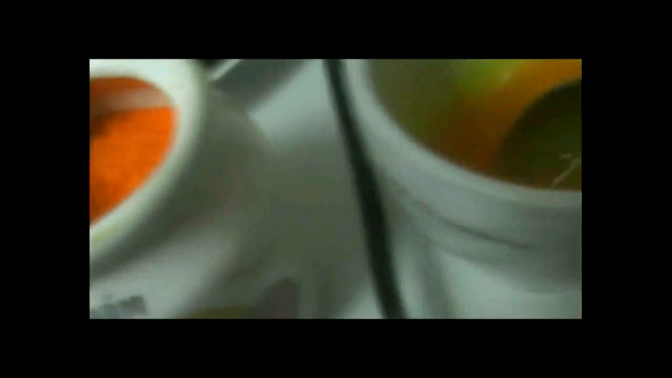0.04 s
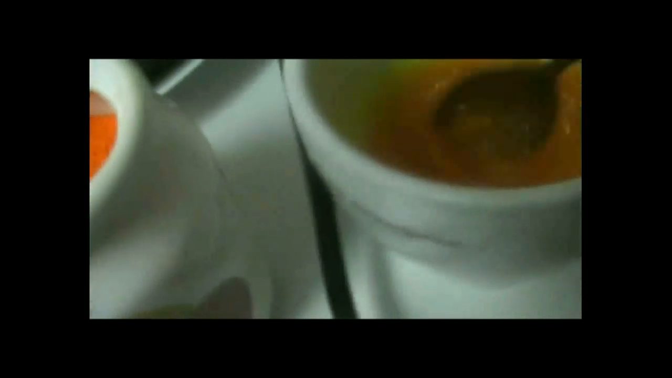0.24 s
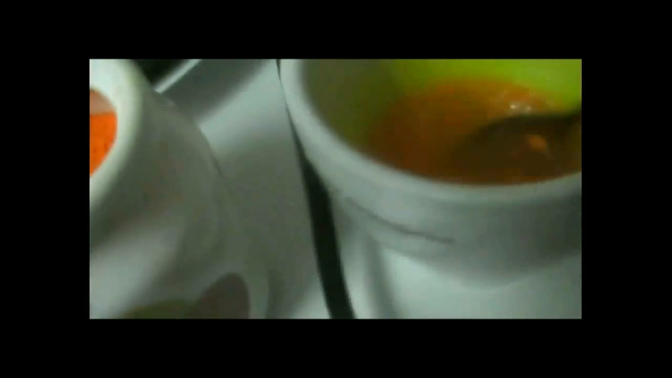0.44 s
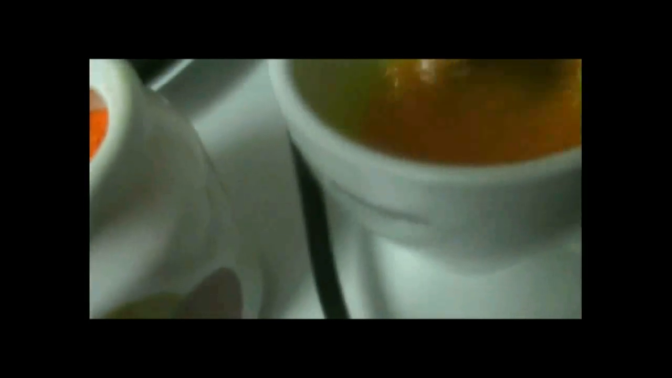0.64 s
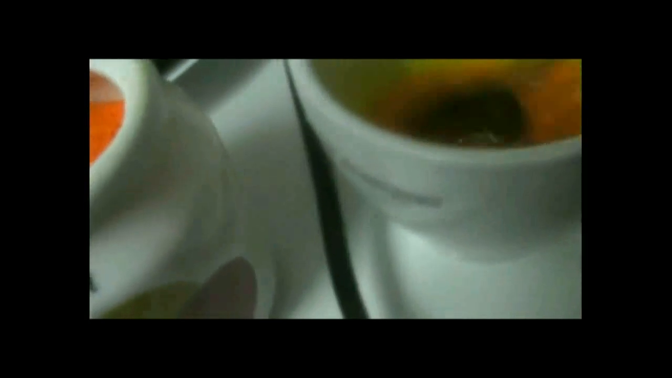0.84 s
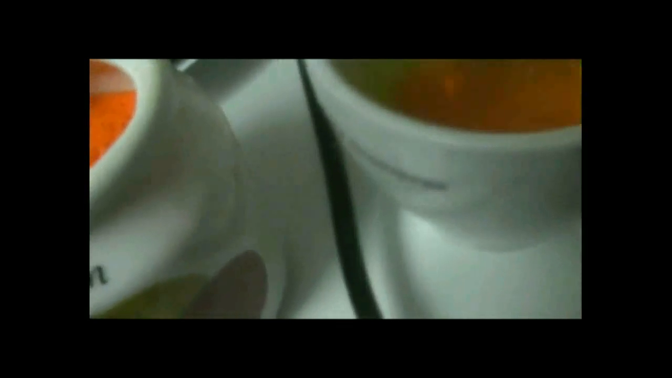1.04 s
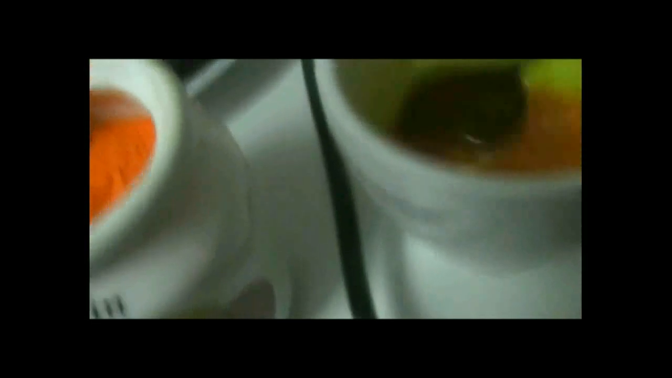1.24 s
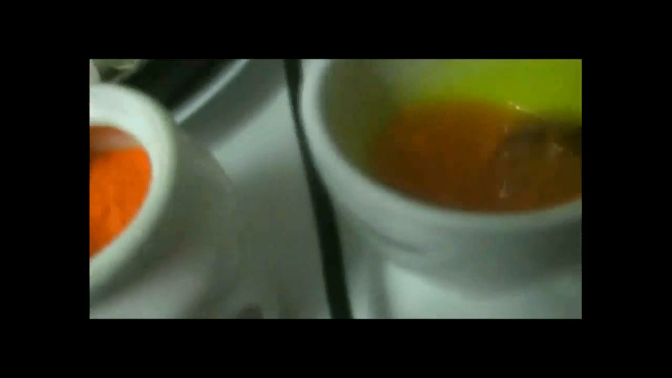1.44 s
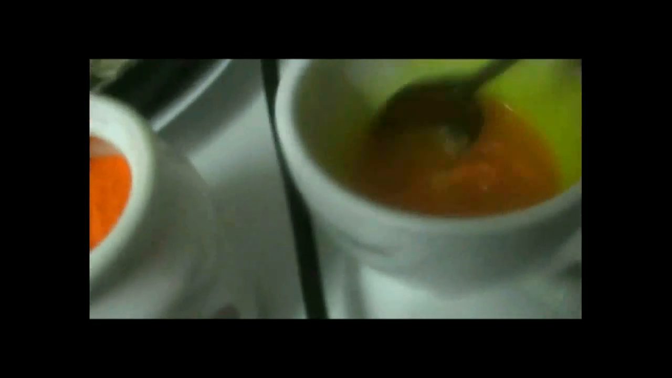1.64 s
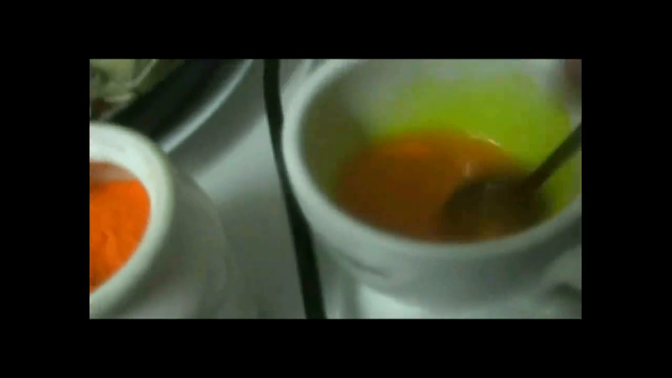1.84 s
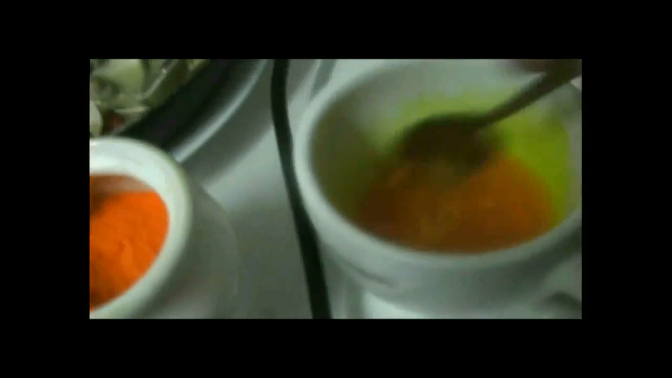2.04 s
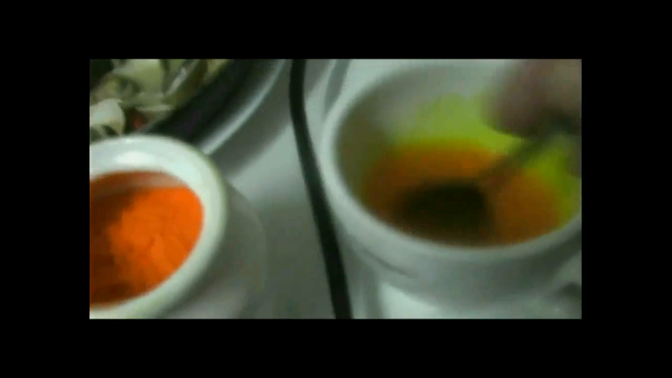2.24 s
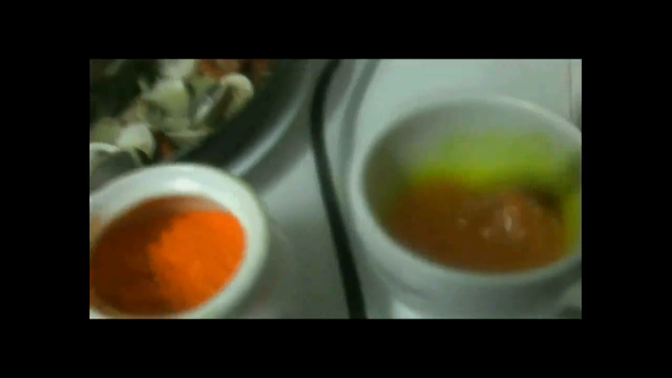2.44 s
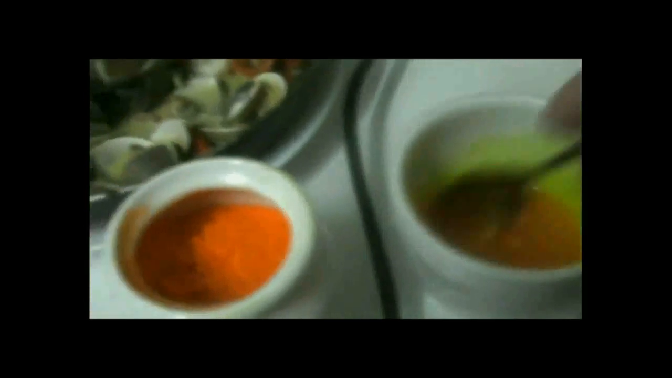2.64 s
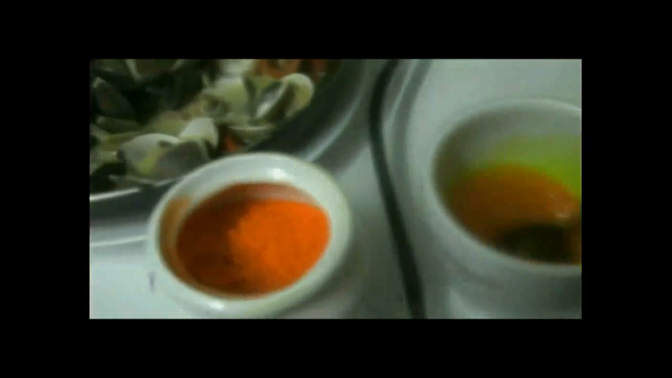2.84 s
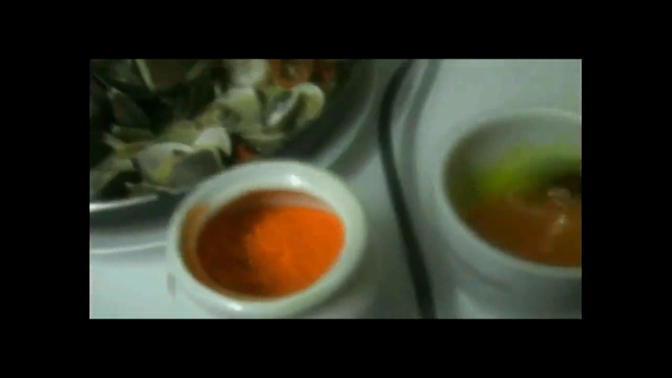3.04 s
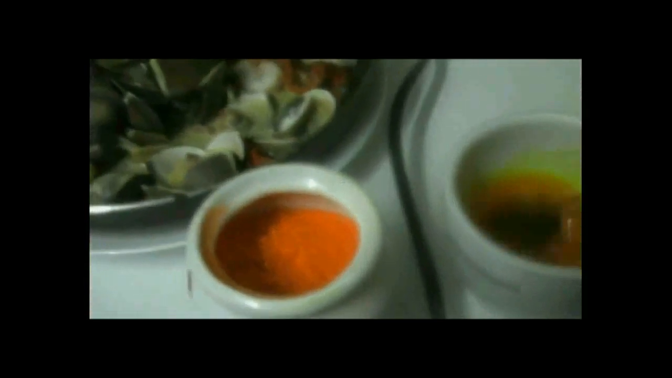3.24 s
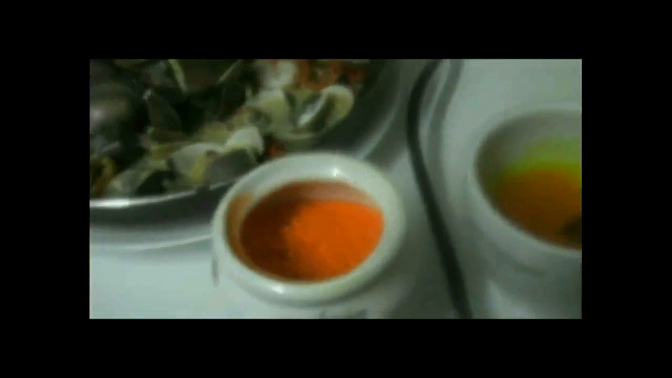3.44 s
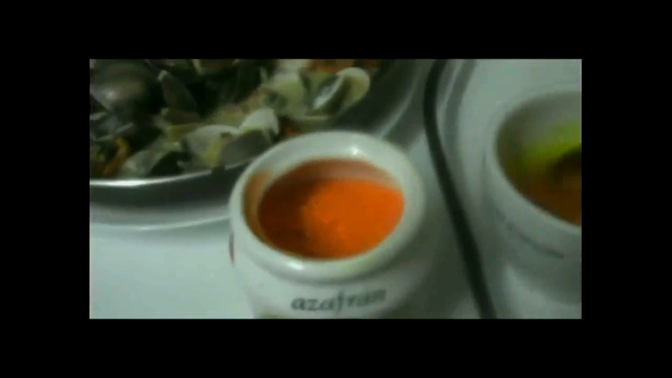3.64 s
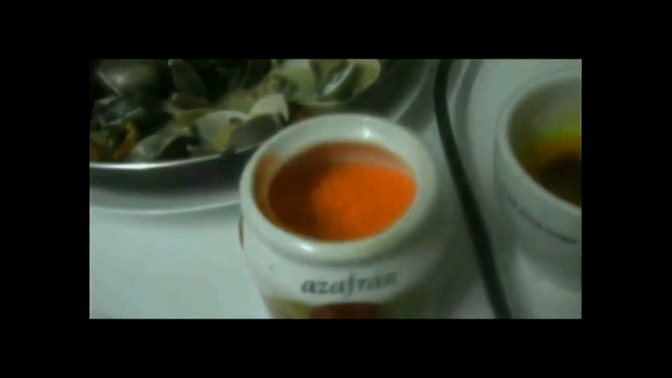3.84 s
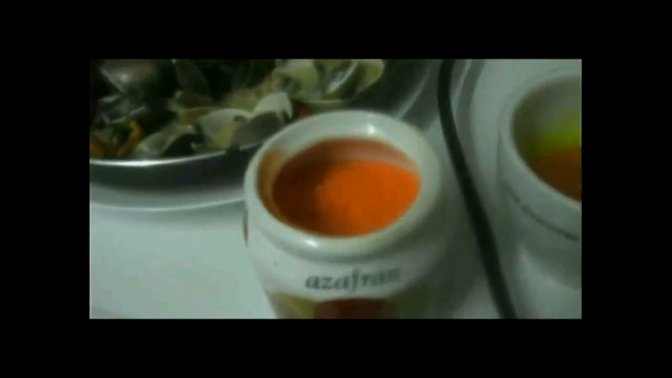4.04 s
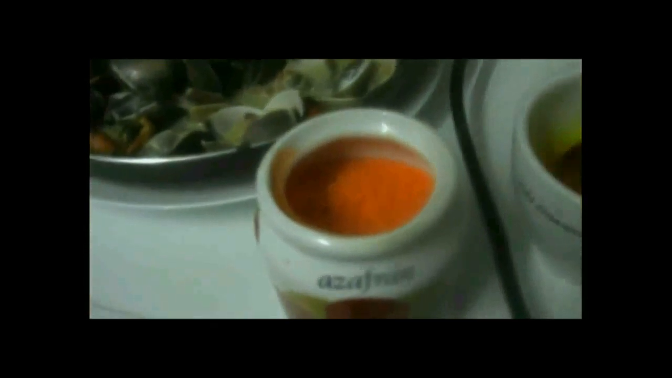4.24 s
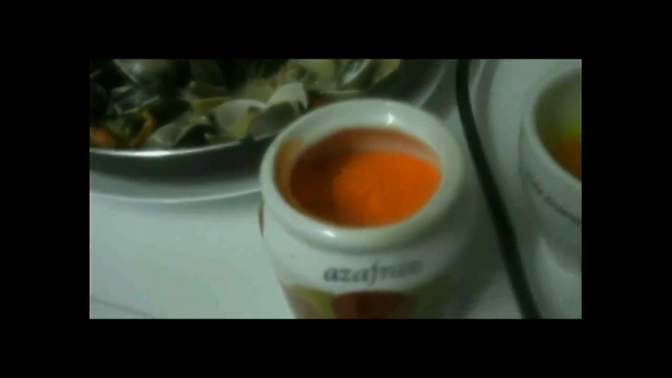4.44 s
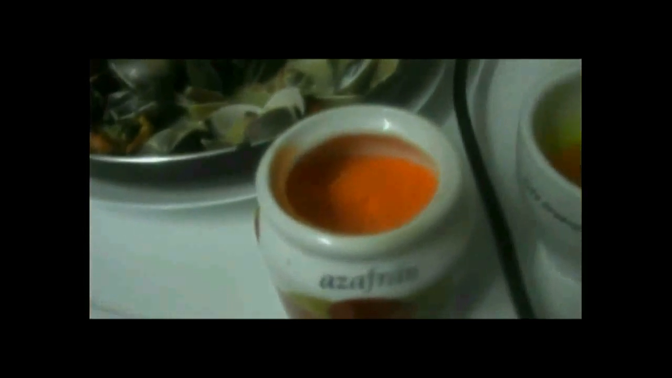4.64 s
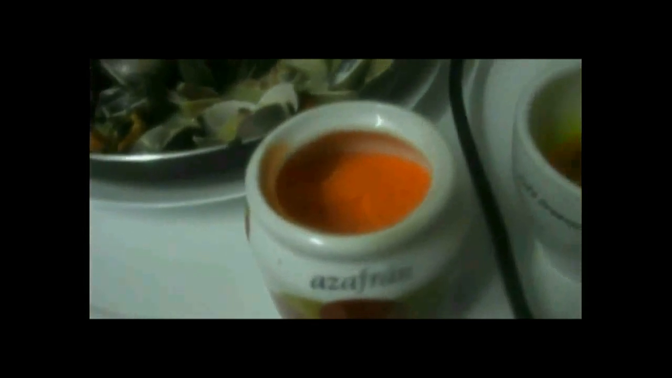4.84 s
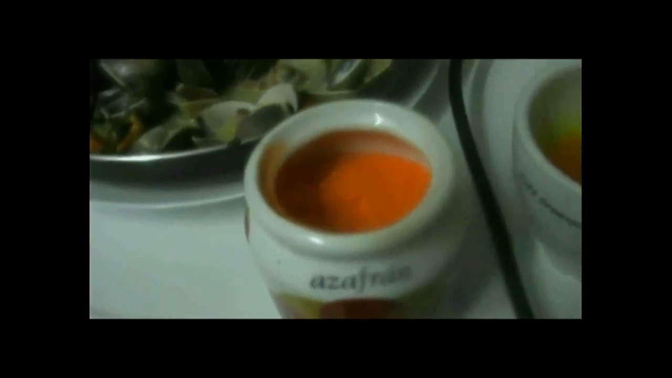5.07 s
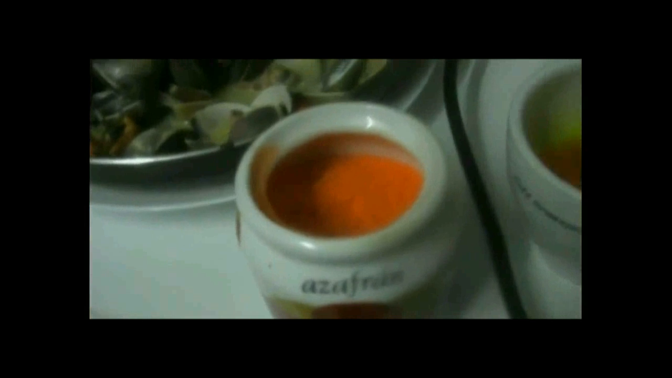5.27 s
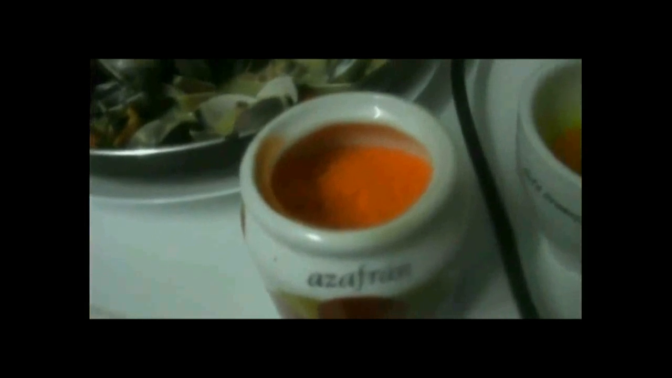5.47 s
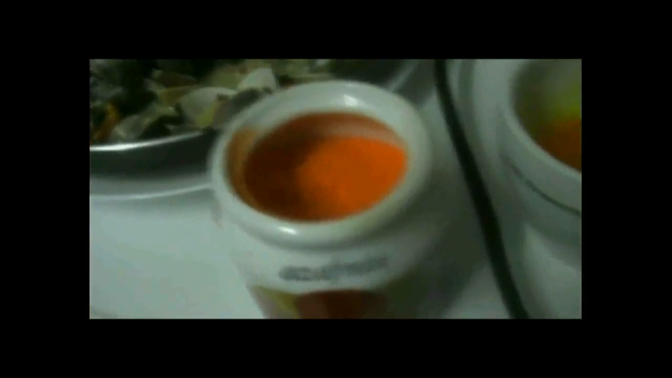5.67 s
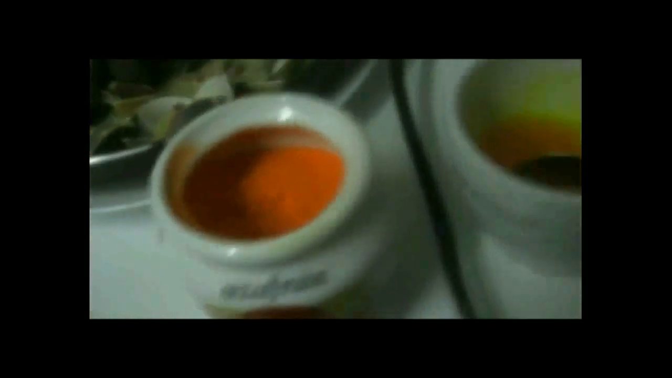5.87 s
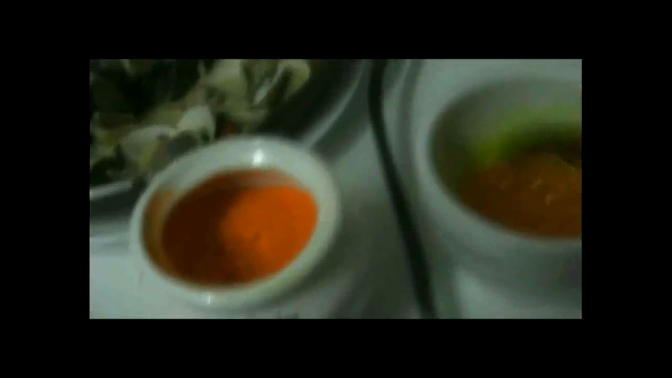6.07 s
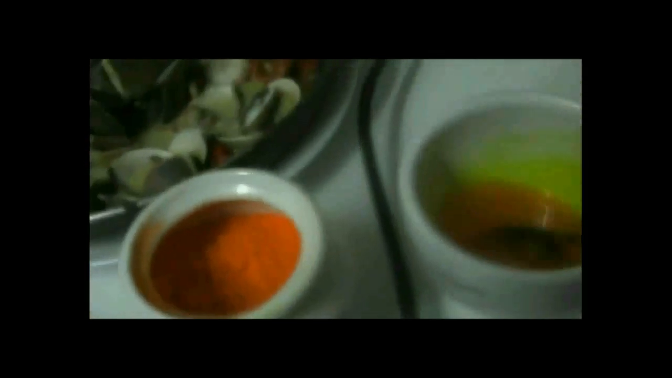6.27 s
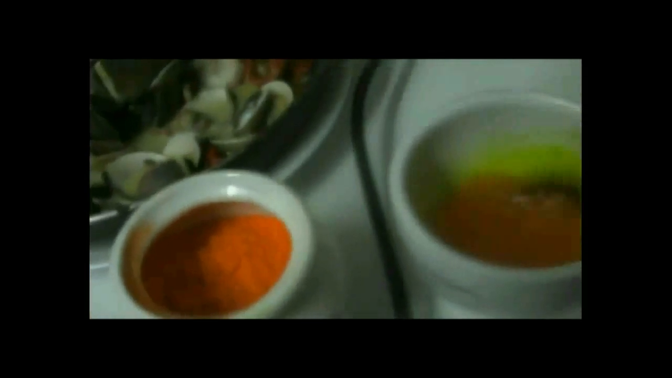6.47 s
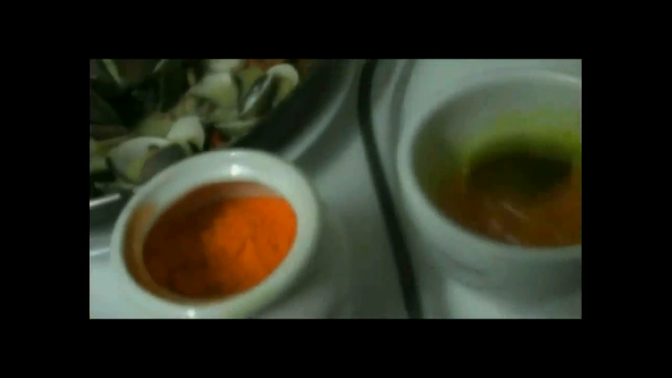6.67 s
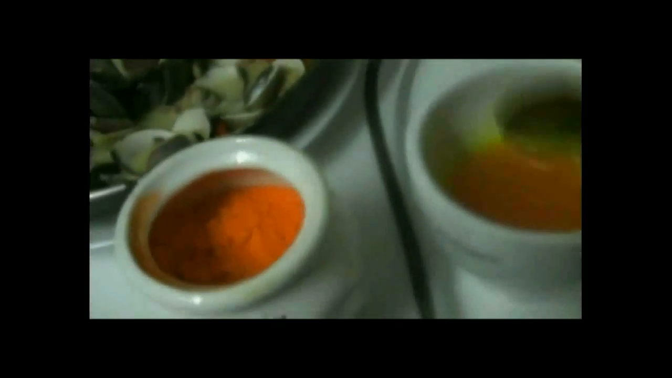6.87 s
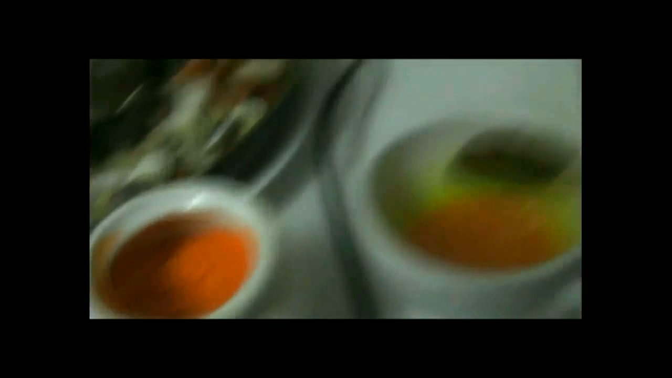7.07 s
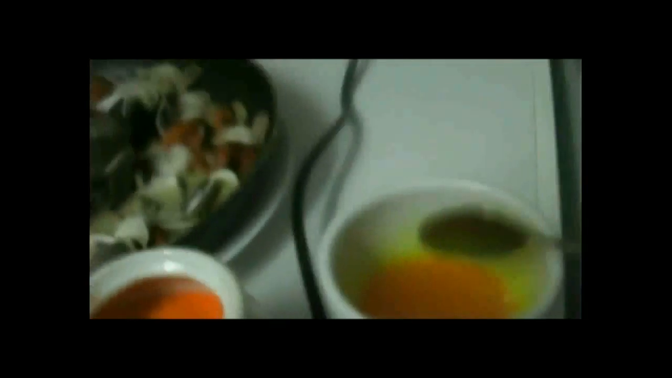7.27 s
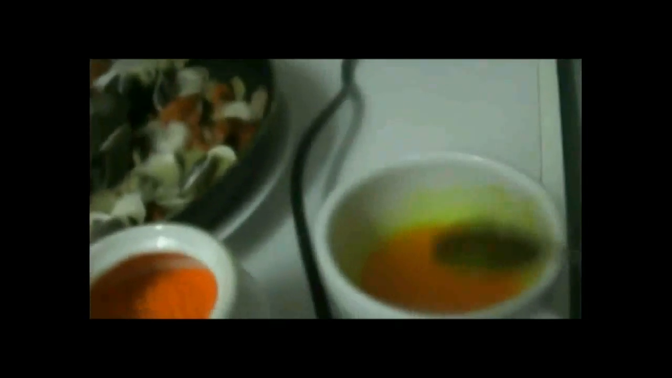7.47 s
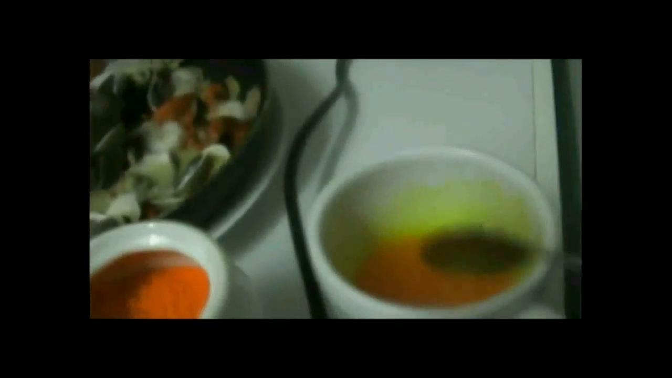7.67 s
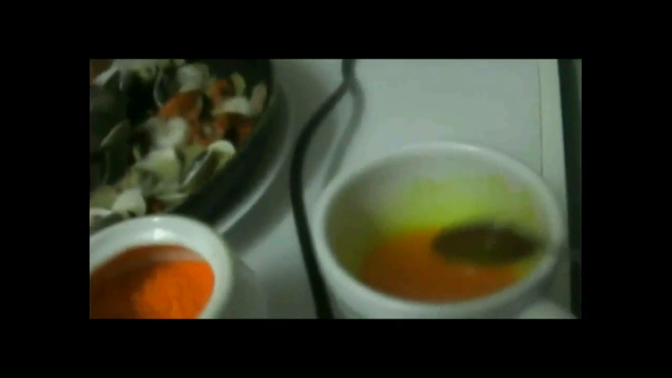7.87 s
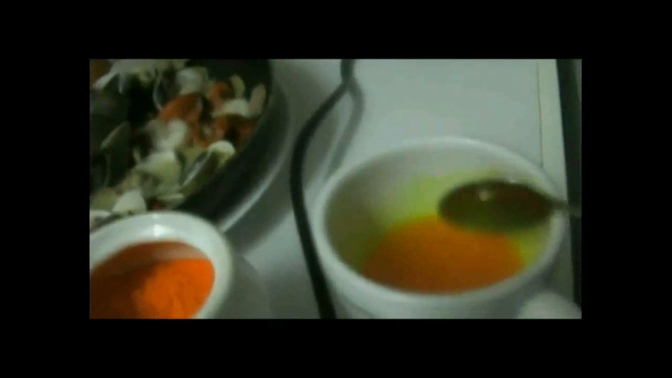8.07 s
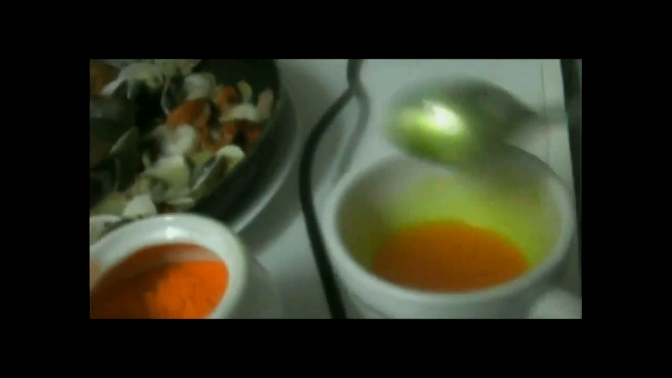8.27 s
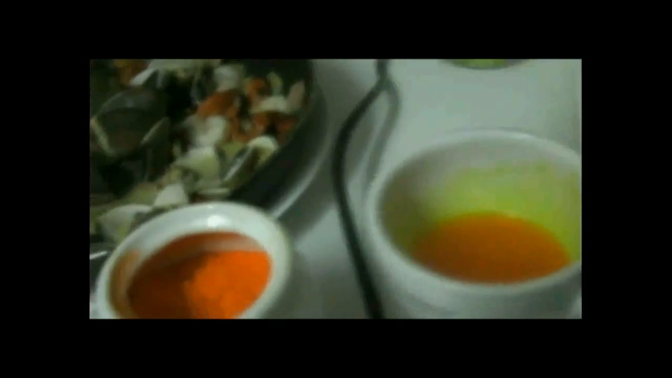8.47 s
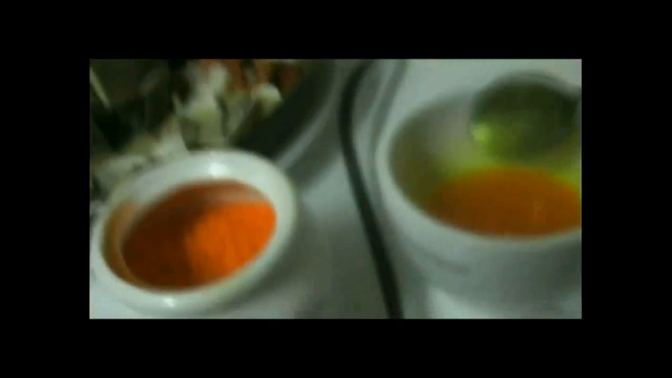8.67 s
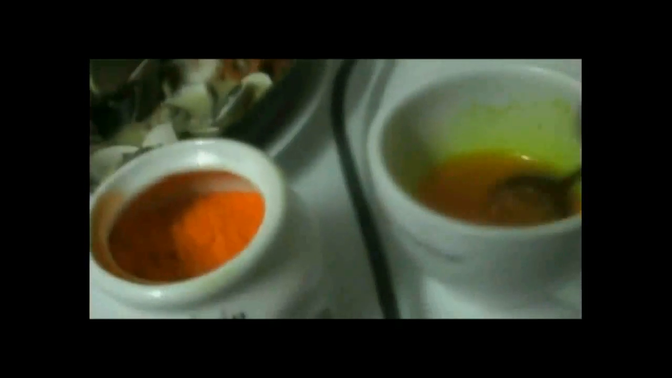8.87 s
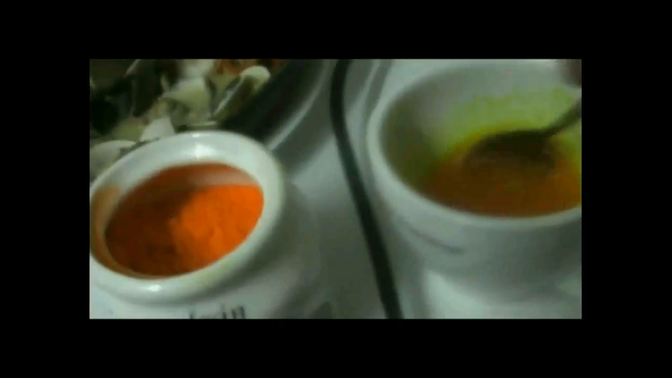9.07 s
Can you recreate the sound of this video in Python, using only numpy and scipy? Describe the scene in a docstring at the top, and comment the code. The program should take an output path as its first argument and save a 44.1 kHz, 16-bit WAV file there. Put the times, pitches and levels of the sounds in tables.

```python
"""A steel spoon stirs a thick liquid in a ceramic cup, about three turns a second, close to two microphones.
It is knocked off on the rim and goes back in. Each touch is a short chatter of noise through the damped
spoon's resonances, with a sine ping, and sets the cup's wall modes ringing as dying sines.
Between touches the spoon glides along the wall as resonant noise; heavy blows jolt the table.
Behind, an appliance hums in the small kitchen; the recorder's limiter holds peaks above full scale down."""
import sys
import numpy as np
from scipy import signal
from scipy.fft import rfft, irfft, next_fast_len
from scipy.io import wavfile
from scipy.ndimage import uniform_filter1d, minimum_filter1d

SR = 44100
rng = np.random.default_rng(int(sys.argv[2]) if len(sys.argv) > 2 else 0)


def log_audio(samples):
    """Write samples as a 16-bit WAV file to the path given in sys.argv[1]."""
    # one column per channel
    frames = np.atleast_2d(samples).T
    # limit to full scale, then quantise
    limited = np.clip(frames, -1, 1)
    pcm = np.round(limited * 32767).astype(np.int16)
    wavfile.write(sys.argv[1], SR, pcm)


N = 401736
TIME = np.arange(N) / SR

# The kitchen's air, heard behind the cup. Each row: frequency in Hz, relative level in dB per Hz.
ROOM_TONE = [(18, -57), (30, -16.5), (102, -18.5), (119, -20), (151, -13.5), (266, -16), (302, -7.5),
             (452, -14), (487, -8), (524, -11.5), (677, -9), (995, -15.5), (1260, -8), (1960, -26),
             (2400, -68), (3120, -73), (5280, -120)]
# The microphones' hiss. Each row: frequency in Hz, relative level in dB per Hz.
MICROPHONE_HISS = [(1180, -51), (2000, -12.5), (2280, -8), (3120, 0), (3490, -5.5), (4490, -13),
                   (5070, -2.5), (6090, -12), (7570, -3), (8260, -12), (9490, -7.5), (12300, -18),
                   (13300, -17.5), (16000, -19)]
ROOM_TONE_DB, MICROPHONE_HISS_DB = -45.5, -49  # rms
# The appliance's hum. Each row: frequency in Hz, rms level in dB.
HUM = [(49, -70), (98, -65), (148, -61.5), (344.5, -64.5), (491.2, -47), (684, -61.5)]
# How alike the two microphones hear diffuse sound. Each row: frequency in Hz, left-right correlation.
LIKENESS = [(60, .75), (300, .95), (700, .8), (1400, .78), (3500, .95), (8000, .25), (14000, .1)]
# How long the kitchen rings on. Each row: frequency in Hz, t60 in s.
KITCHEN_T60 = [(150, 0.42), (1000, 0.39), (4000, 0.49), (8000, 0.24), (15000, 0.36)]
# How loud the kitchen answers. Each row: frequency in Hz, reverberation over direct sound in dB.
KITCHEN_DB = [(150, -2.5), (1000, -5.5), (3000, -10), (5000, -2), (8000, -22), (15000, -0.5)]

# Heavy blows jolt the cup on the table. Each row: start in seconds, rms level in dB before rise and decay.
JOLTS = [(2.159, -48), (3.031, -36.5), (3.199, -42.5), (5.149, -34), (6.18, -37.5), (6.365, -28),
         (6.549, -25.5), (7.5, -32)]
JOLT_HZ, JOLT_WIDTH_HZ, JOLT_T60_S, JOLT_RISE_S = 194, 150, 0.36, 0.0022

# Turns of the stirring. Each row: time in seconds at the far wall, pressure on the wall in dB.
TURNS = [(.02, 1), (.36, 2), (.69, 5.5), (1.02, 2.5), (1.36, 2.5), (1.69, 1), (1.99, 0.5), (2.3, 1.5),
         (2.58, -1.5), (2.92, 1), (3.25, -8), (3.55, -3.5), (3.86, -1), (4.17, -27), (4.5, -9.5),
         (4.83, -5)]
TURN_S = .32
# The two wall sweeps of a turn. Each row: share of the turn, length at half pressure in s,
# bowl rasp in dB and bright hiss in dB (before the trims in glide), bowl resonance in mid-sweep in Hz.
PASSES = [(-.03, .115, -47.5, -48, 5740), (0.426, .08, -48, -48.5, 5300)]
# Hard drags over the bottom. Each row: middle in seconds, length at half pressure in s,
# rasp in dB (before the trim in glide), bowl resonance in mid-drag in Hz.
SCRAPES = [(1.573, 0.035, -44, 3390), (1.907, 0.075, -38, 5100), (2.21, .12, -37, 4880),
           (5.117, 0.073, -34, 5000), (8.971, .055, -37, 5270), (9.067, 0.058, -34, 5500)]
SCRAPE_HISS_DB = -8.5  # bright hiss over the rasp, before the trims
# Body of the sweeping spoon. Each row: multiple of the bowl resonance, width in Hz, relative level in dB.
RASP_MODES = [(1.0, 480, 0), (.58, 900, -7), (1.35, 1300, -7)]
# Treble of the sweeping spoon. Each row: multiple of the bowl resonance, width in Hz, relative level in dB.
HISS_MODES = [(1.78, 420, -1), (2.0, 600, -4), (2.35, 800, -13)]
SWEEP_RISE = .03   # share by which the resonances climb in each half of a sweep
SWEEP_ARCH = .055  # share by which they sink at both ends of it

# The cup's wall modes; the handle splits the main ones into close pairs. Each entry: frequency in Hz.
CUP_HZ = [3261, 3538, 5597, 6345, 6840, 8031, 8297, 11930, 12915]
# The same modes in the same order. Each row: relative level in dB, t60 in s.
CUP_MODES = [(0.5, 0.55), (4.5, 0.56), (-24, .25), (-33, .2), (-6, .2), (10.5, 0.29), (2, 0.34),
             (-25, 0.46), (-14, 0.19)]
# the overtones need both a sharp tick and a full ring: dB per dB of tick, dB per dB of ring, offset in dB
OVERTONE_PER_TICK, OVERTONE_PER_RING, OVERTONE_DB = 0.59, .75, -4

# Spoon on cup. Each row: start in seconds, main spoon resonance in Hz, chatter t60 in s, strength in dB,
# hardness as treble over body in dB, freedom of the bowl in dB (high pings, low knocks),
# ring of the cup's lower tone in dB, ring of its upper tone in dB (both before the mode's own level).
CLINKS = [(.162, 5040, 0.043, -28.5, -2.5, 0, -47, -47), (.2296, 5500, 0.017, -34.5, -9.5, -1, -22, -43),
          (0.293, 5330, 0.011, -49.5, 10, 3, -42, -55), (.3798, 5220, 0.025, -47.5, 15, 9.5, -58, -60),
          (.431, 5140, 0.028, -56, -16, -1, -42, -44), (.603, 5670, 0.033, -22, 5, 0, -22, -23.5),
          (.867, 5220, .047, -29, 0.5, -1.5, -31, -28.5), (1.198, 4950, 0.044, -29, 2, 3, -36, -44),
          (1.217, 5000, 0.087, -41.5, -3, -11.5, -32, -50), (1.4926, 5670, 0.037, -43.5, 2, -2, -58, -61),
          (1.5313, 4940, 0.036, -39, -6, -6, -41, -42), (1.595, 4400, 0.037, -48, -23.5, -4, -31, -47),
          (1.6305, 5360, .032, -34.5, 5, 0, -62, -37), (1.8627, 5290, 0.054, -33, -7, -0.5, -31, -35),
          (2.149, 4940, 0.034, -26.5, -5.5, 2.5, -39, -48), (2.242, 4780, 0.038, -32, -13, 0, -43, -32.5),
          (2.3756, 5300, 0.052, -39, 2, -2.5, -25, -40), (2.44, 5060, .028, -36, -7.5, 4.5, -33, -41),
          (2.533, 4940, 0.062, -46, -15.5, -6.5, -54, -51),
          (2.7113, 4950, 0.087, -42, -2, -2.5, -30, -26.5),
          (2.7807, 4970, 0.026, -29.5, -1.5, 0, -50, -35.5),
          (3.0235, 5470, 0.039, -31.5, 2, -3, -24.5, -27), (3.1907, 5200, 0.032, -25, 0.5, 5.5, -30, -20),
          (3.3354, 5200, .039, -40.5, 3.5, -3.5, -30, -30), (3.472, 5120, 0.055, -46, -11, -6, -51, -59),
          (3.4884, 4900, 0.048, -32.5, -6, -2, -29, -34.5),
          (3.7205, 5100, .042, -29.5, 5.5, -2.5, -39, -33.5),
          (4.0225, 5050, 0.053, -28.5, 3.5, 0.5, -60, -37.5),
          (4.2523, 5200, .026, -33.5, 11.5, 1.5, -24, -18), (4.3015, 5900, 0.054, -31.5, 1, 0, -37, -28.5),
          (4.538, 5250, 0.011, -48.5, 13, -6, -51, -64), (4.5807, 5000, 0.04, -48, -11, -5, -43, -38.5),
          (4.6655, 5790, .065, -24.5, 5.5, 1, -29.5, -30.5), (4.7748, 4880, .061, -39.5, 0, 2, -48, -42),
          (4.796, 5000, .036, -49.5, -7, 11.5, -43, -49), (4.921, 5200, 0.05, -52.5, -3.5, -12, -57, -63),
          (5.057, 5670, 0.096, -25.5, 12, 1, -20, -27), (5.144, 5200, .055, -29, 4.5, -2, -29, -35),
          (5.212, 5160, .045, -40, -2, -2, -29.5, -34.5), (6.171, 5810, 0.036, -23.5, 2.5, -4, -22, -9.5),
          (6.216, 5700, 0.064, -31.5, 0, 0.5, -10, -11), (6.3615, 4930, 0.036, -19.5, 11.5, -2, -23, -22),
          (6.5464, 5140, 0.041, -21, 8.5, -1, -9.5, -22.5),
          (6.7372, 5400, 0.063, -29, -1.5, -5.5, -16, -4.5),
          (7.497, 5330, 0.056, -20.5, 3.5, -1.5, -30, -34), (7.7494, 4940, .04, -37.5, 1.5, 0, -60, -35),
          (7.7893, 5580, 0.041, -41.5, 0, -0.5, -36, -28.5),
          (8.9236, 5060, 0.061, -21.5, 2.5, -8, -45, -58), (9.0116, 5200, 0.051, -26.5, 10, 1, -50, -58),
          (9.0404, 6000, 0.12, -32, 16, 4.5, -52, -53), (9.079, 5690, 0.041, -37, -3, 5, -36, -46)]
# Registers of a touch, from the table's thud to the top of the tick. Each row: low edge in Hz, high edge
# in Hz, resonance in Hz (the main register takes it from the touch), width in Hz, resonance over the
# broad clatter in dB, free ping over the clatter in dB, t60 as a multiple of the chatter's, level over
# the touch's strength in dB, share of the hardness it gains, share of the freedom it gains.
SPOON_REGISTERS = [(139, 710, 188, 40, -25, -10.5, 2.0, -10, -0.24, -0.02),
                   (750, 1833, 1428, 240, -1.5, -4, 1.1, -4, -0.4, -0.72),
                   (2506, 3840, 3206, 310, 2.5, -10, .9, 4, -0.59, -0.52),
                   (4587, 5800, 5150, 420, 4, 1, 1.0, 10.5, -0.31, 1),
                   (6330, 8980, 7210, 1070, -0.5, 4, 1.0, 3, 0.68, -0.44),
                   (8800, 10050, 9400, 100, 13, 5.5, 1.0, 3.5, 0.49, 0.17),
                   (9800, 14400, 11480, 200, -0.5, -19, 1.0, -3.5, .45, 0.16)]

CUTOFF_HZ = 15900  # top of the recorded sound


def from_db(db):
    """Decibels to gain."""
    return 10 ** (np.asarray(db) / 20)


def rms_one(x):
    """Scale to rms 1."""
    return x / np.sqrt(np.mean(x ** 2) + 1e-20)


def at_hz(points, hz):
    """Read a table on a log-frequency axis."""
    f, value = np.transpose(points)
    return np.interp(np.log(np.maximum(hz, 1)), np.log(f), value)


def add(out, s, sound):
    """Mix a sound in at time s."""
    start = round(s * SR)
    out[..., start:start + sound.shape[-1]] += sound[..., :N - start]


def band(x, low, high, order=3):
    """Butterworth band-pass."""
    edges = [low, min(high, .45 * SR)]
    return signal.sosfilt(signal.butter(order, edges, "band", fs=SR, output="sos"), x)


def resonate(x, hz, width):
    """One two-pole resonance, gain about 1 on top."""
    r = np.exp(-np.pi * width / SR)
    feed = np.array([1, 0, -1]) * (1 - r * r) / 2
    return signal.lfilter(feed, [1, -2 * r * np.cos(2 * np.pi * hz / SR), r * r], x)


def drift(rate):
    """Random wandering of rms 1, with straight lines between `rate` knots a second."""
    knots = rng.standard_normal(int(N / SR * rate) + 2)
    return rms_one(np.interp(TIME * rate, np.arange(len(knots)), knots))


def stereo(pair, alike):
    """Two unrelated signals become left and right with a given correlation."""
    alike = np.clip(alike, 0, .999)
    middle = np.sqrt((1 + alike) / 2) * pair[0]
    side = np.sqrt((1 - alike) / 2) * pair[1]
    return middle + side * np.array([[1], [-1]])


def steady_noise(spectrum):
    """Stereo noise of a given colour, rms 1, rolled off beyond the ends of its table."""
    size = next_fast_len(N)
    hz = np.fft.rfftfreq(size, 1 / SR)
    pair = rfft(rng.standard_normal((2, size))) * from_db(at_hz(spectrum, hz))
    lowest, highest = spectrum[0][0], spectrum[-1][0]
    inside = 1 / (1 + (hz / highest) ** 10) / (1 + (lowest / (hz + 1)) ** 10)
    return rms_one(irfft(stereo(pair, at_hz(LIKENESS, hz)) * inside, size)[:, :N])


def background():
    """An appliance motor hums steadily over the rush of its fan and the microphones' hiss."""
    motor_time = np.cumsum(1 + .001 * drift(2)) / SR  # its speed hardly varies
    hum = np.zeros(N)
    for hz, db in HUM:
        hum += from_db(db) * np.sqrt(2) * np.sin(2 * np.pi * (hz * motor_time + rng.random()))
    air = from_db(ROOM_TONE_DB) * steady_noise(ROOM_TONE)
    hiss = from_db(MICROPHONE_HISS_DB) * steady_noise(MICROPHONE_HISS)
    return hum + air + hiss


def kitchen(x):
    """Diffuse reflections are noise tails in eight bands, each dying at its own rate."""
    t, response = TIME[:SR // 2], 0
    edges = np.geomspace(100, 16000, 9)
    arrival = np.clip(t / .008 - .5, 0, 1)  # fades in from 4 to 12 ms after the direct sound
    for low, high in zip(edges, edges[1:]):
        hz = np.sqrt(low * high)
        tail = stereo(band(rng.standard_normal((2, len(t))), low, high), at_hz(LIKENESS, hz))
        tail = tail * from_db(-60 * t / at_hz(KITCHEN_T60, hz)) * arrival
        direct_level = np.sqrt(2 * (high - low) / SR / len(t))  # as strong as the direct sound in this band
        response = response + from_db(at_hz(KITCHEN_DB, hz)) * rms_one(tail) * direct_level
    return signal.fftconvolve(x.mean(axis=0)[None], response, axes=1)[:, :N]


def jolts(rumble_db=-2.5, rumble_top_hz=450):
    """The table top booms briefly as resonant noise, over a deep rumble."""
    out, t = np.zeros(N), TIME[:SR // 2]
    envelope = (1 - np.exp(-t / JOLT_RISE_S)) * from_db(-60 * t / JOLT_T60_S)
    for s, db in JOLTS:
        shake = rng.standard_normal(len(t))
        boom = rms_one(resonate(band(shake, 100, 1200), JOLT_HZ, JOLT_WIDTH_HZ))
        rumble = rms_one(band(shake, 22, rumble_top_hz, order=2))
        add(out, s, from_db(db) * envelope * rms_one(boom + from_db(rumble_db) * rumble))
    return out


def sweeps():
    """Every glide: middle in s, length in s, rasp in dB, bright hiss in dB, mid-sweep resonance in Hz."""
    glides = []
    for s, press_db in TURNS:
        for share, length, rasp_db, hiss_db, hz in PASSES:
            glides.append((s + share * TURN_S, length, rasp_db + press_db, hiss_db + press_db, hz))
    for s, length, db, hz in SCRAPES:
        glides.append((s, length, db, db + SCRAPE_HISS_DB, hz))
    return glides


def glide(rasp_trim_db=0.5, hiss_trim_db=-0.5, grain_db=3.5, cup_width_hz=25):
    """Friction on the glaze hisses in resonances that rise and fall, and keeps the cup singing faintly."""
    out, friction, t = np.zeros((2, N)), np.zeros(N), TIME[:SR // 2]
    for middle, length, bowl_db, bright_db, top_hz in sweeps():
        start = max(middle - length, 0)
        place = np.clip((start + t - middle) / length, -1, 1)
        grit = np.repeat(rng.standard_normal(len(t) // 50), 50)  # a new grain every 50 samples
        pressure = np.cos(np.pi / 2 * place) ** 2 * from_db(grain_db * grit)
        bend = 1 + SWEEP_RISE * place - SWEEP_ARCH * np.sin(np.pi / 2 * place) ** 2
        cycles = np.cumsum(top_hz * bend) / SR
        for modes, level_db in ((RASP_MODES, bowl_db + rasp_trim_db), (HISS_MODES, bright_db + hiss_trim_db)):
            for multiple, width, mode_db in modes:
                # slow noise on a moving carrier is a noise band that follows the resonance
                low_pass = signal.butter(2, width / 2, fs=SR, output="sos")
                slow = signal.sosfilt(low_pass, rng.standard_normal((2, 2, len(t))))
                angle = 2 * np.pi * multiple * cycles
                hiss = rms_one(slow[0] * np.cos(angle) + slow[1] * np.sin(angle))
                wide = stereo(hiss, at_hz(LIKENESS, multiple * top_hz))
                add(out, start, from_db(level_db + mode_db) * pressure * wide)
        add(friction, start, from_db(bowl_db) * pressure * rng.standard_normal(len(t)))
    singing = sum(resonate(friction, hz, cup_width_hz) for hz in CUP_HZ[:2])
    return out + rms_one(singing) * np.std(friction)


def cup(build_s=0.00027, damp_s=.005, overtone_lag=1.45, flutter=0.63, flutter_rate=130, rub_s=0.21,
        spot_db=3.0, clean_ring_db=-8):
    """The wall rings until the next touch stops it and strikes it afresh; the rubbing spoon roughens it."""
    out, t = np.zeros((2, N)), TIME[:SR]
    next_touch = [row[0] for row in CLINKS[1:]] + [N / SR]
    for (s, _, _, strength_db, hardness_db, _, lower_db, upper_db), stop in zip(CLINKS, next_touch):
        tick_db = strength_db + hardness_db / 2
        ring_db = max(lower_db, upper_db)
        overtone_db = OVERTONE_DB + OVERTONE_PER_TICK * tick_db + OVERTONE_PER_RING * ring_db
        age = t[t < stop - s + 10 * damp_s]
        damping = np.exp(-np.maximum(age - (stop - s), 0) / damp_s)
        gate = (1 - np.exp(-age / build_s)) * damping
        # the point of contact favours different overtones each time
        strengths = [lower_db, upper_db, *rng.normal(overtone_db, spot_db, len(CUP_MODES) - 2)]
        for hz, (mode_db, t60), level_db in zip(CUP_HZ, CUP_MODES, strengths):
            knots = rng.standard_normal((2, 400))
            rubbing = flutter * np.exp(-age / rub_s)  # the spoon soon leaves the wall and the tone clears
            rubbing /= 1 + from_db(ring_db - clean_ring_db)  # it springs off a full blow at once
            wobble = np.interp(age * flutter_rate, np.arange(knots.shape[1]), knots[0] + 1j * knots[1])
            uneven = 1 + rubbing * wobble  # complex: level and phase both flutter
            lag = np.array([[0], [-overtone_lag * min(hz / 8000, 1) ** 2]])  # radians between the microphones
            tone = np.exp(2j * np.pi * (hz * age + rng.random()))
            wave = (uneven * tone * np.exp(1j * lag)).real
            add(out, s, gate * from_db(level_db + mode_db - 60 * age / t60) * wave)
    return out


def spoon(grain_db=4.0, first_touch=4.45, rise_s=0.0012, wander=0.045, bend=0.013, treble_alike=0.29,
          spread_hz=8300, lag=2.2):
    """A touch is a contact and a dying run of micro-bounces through the spoon's damped resonances."""
    out, t = np.zeros((2, N)), TIME[:SR // 6]
    attack = t < .015
    for s, main_hz, chatter_t60, strength_db, hardness_db, freedom_db, _, _ in CLINKS:
        grain = from_db(grain_db * rng.standard_normal(len(t)))
        cushion = 1 - np.exp(-t / rise_s)  # the liquid softens the contact
        bounces = cushion * rms_one(rng.standard_normal((2, len(t))) * grain)
        bounces[0, round(rise_s * SR)] = first_touch
        for (low, high, hz, width, peak_db, ping_db, lasting, register_db,
             hard_share, free_share) in SPOON_REGISTERS:
            # the resonances shift with the point where the spoon is pressed against the wall
            hz = main_hz if low < 5000 < high else hz * (1 + wander * rng.standard_normal())
            fade = from_db(-60 * t / (lasting * chatter_t60))
            clatter = band(bounces * fade, low, high)
            clatter = rms_one(clatter) + from_db(peak_db) * rms_one(resonate(clatter, hz, width))
            # short waves reach the two microphones differently
            apart = 1 - 1 / (1 + (hz / spread_hz) ** 7)
            # the spoon pings, bending in pitch as the contact slides
            pitch = hz * (1 + bend * rng.standard_normal() * (1 - fade))
            microphone_phase = np.array([[0], [lag * apart]])  # radians
            angle = 2 * np.pi * np.cumsum(pitch) / SR + microphone_phase
            ping = rms_one(cushion * fade * np.sin(angle))
            sound = stereo(clatter, 1 - (1 - treble_alike) * apart) + from_db(ping_db) * ping
            sound /= np.sqrt(np.mean(sound.mean(axis=0)[attack] ** 2))  # attack at rms 1
            level_db = strength_db + register_db + hard_share * hardness_db + free_share * freedom_db
            add(out, s, from_db(level_db) * sound)
    return out


def scene():
    """Spoon and cup close to the microphones, the kitchen behind."""
    touches, ring = spoon(), cup()
    reflections = kitchen(touches + .5 * ring)
    return touches + ring + glide() + reflections + background() + jolts()


def record(dry, ceiling=1.0, release_db_per_s=1200):
    """The recorder's fast limiter holds both channels' peaks together; the top is cut."""
    over_db = 20 * np.log10(np.maximum(abs(dry).max(axis=0) / ceiling, 1))
    release_db = release_db_per_s * TIME
    held_db = np.maximum.accumulate(over_db + release_db) - release_db  # instant grip, steady release
    gain = uniform_filter1d(minimum_filter1d(from_db(-held_db), size=33), size=33)  # looks ahead, smooths
    top_cut = signal.ellip(10, .1, 70, CUTOFF_HZ, fs=SR, output="sos")
    return signal.sosfilt(top_cut, dry * gain)


dry = scene()
out = record(dry)
log_audio(out)
```